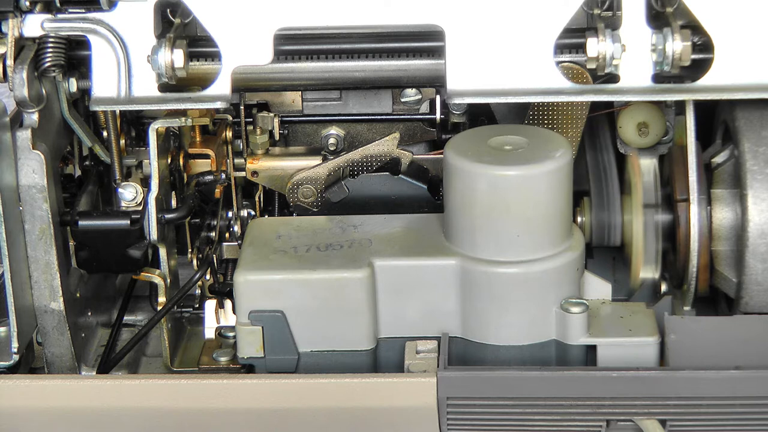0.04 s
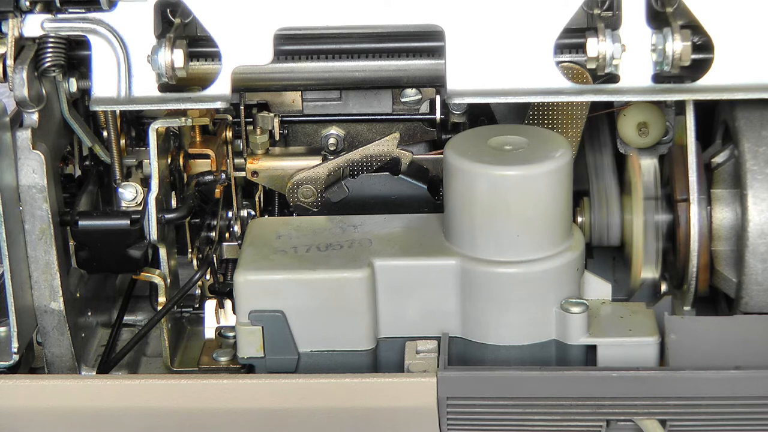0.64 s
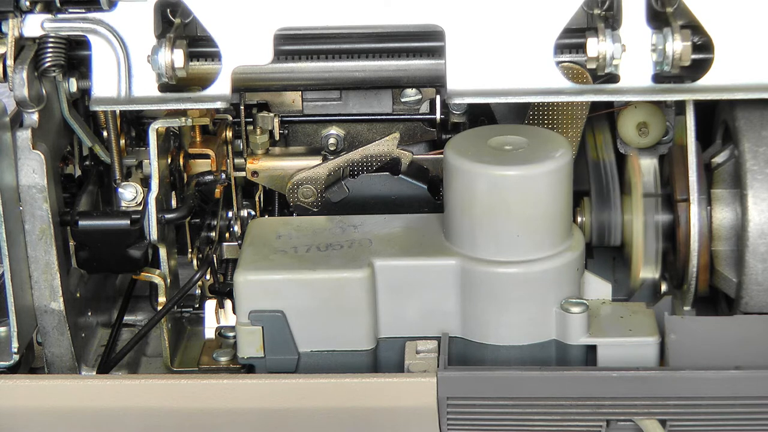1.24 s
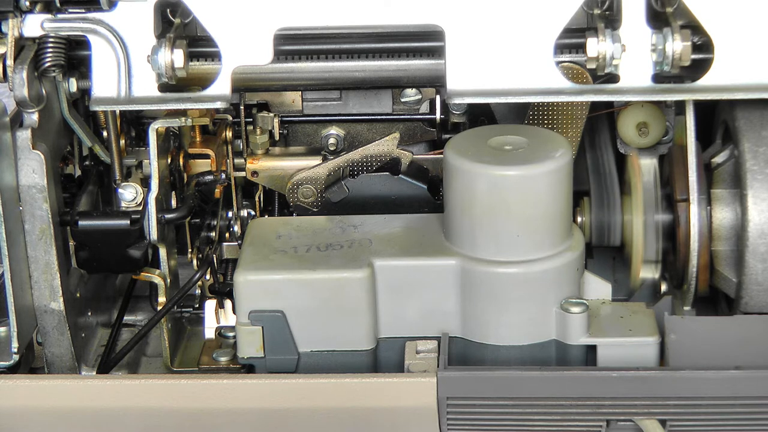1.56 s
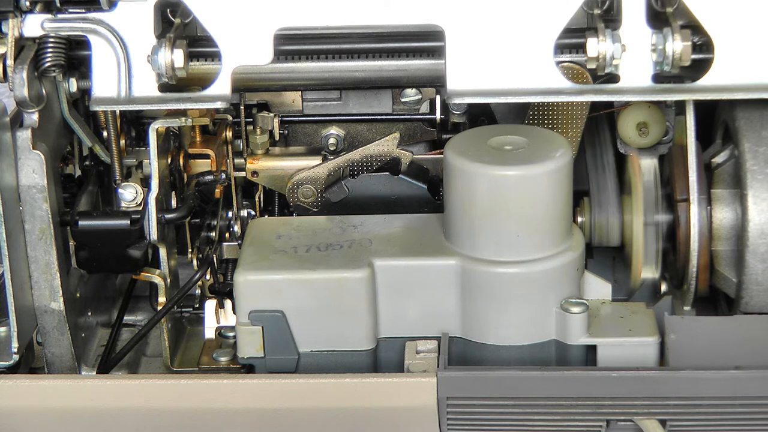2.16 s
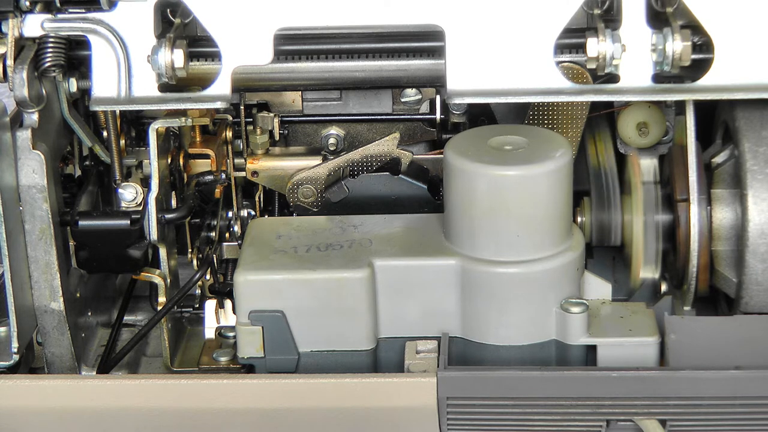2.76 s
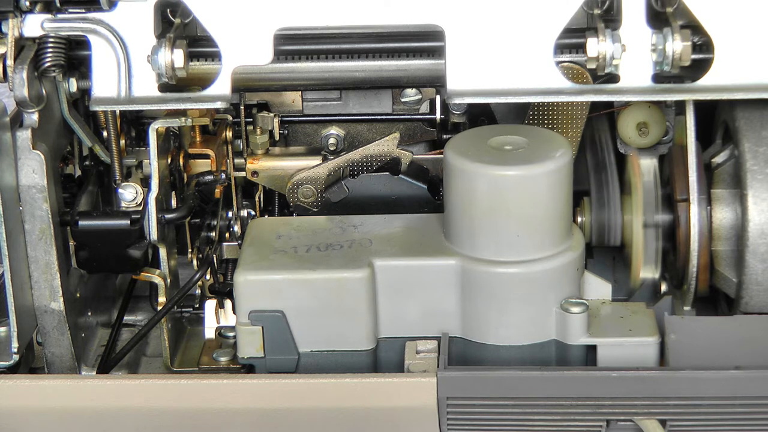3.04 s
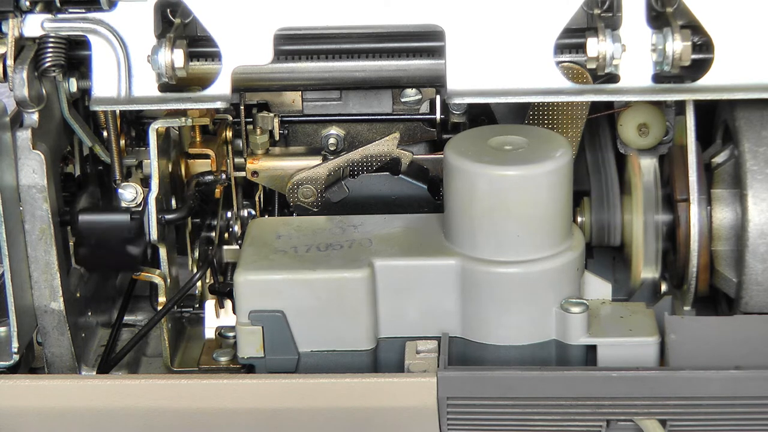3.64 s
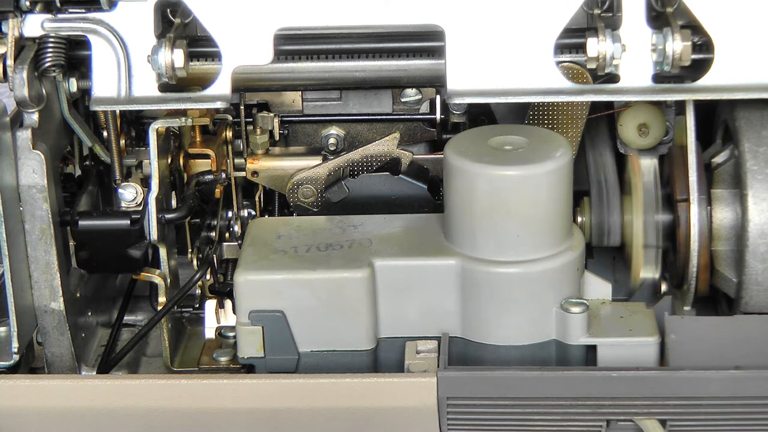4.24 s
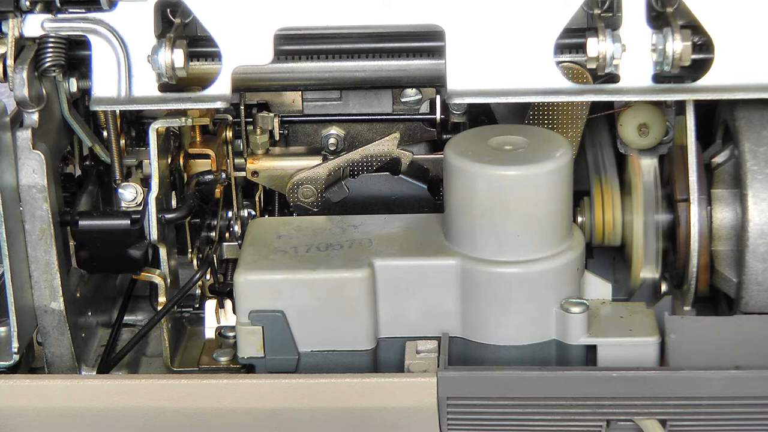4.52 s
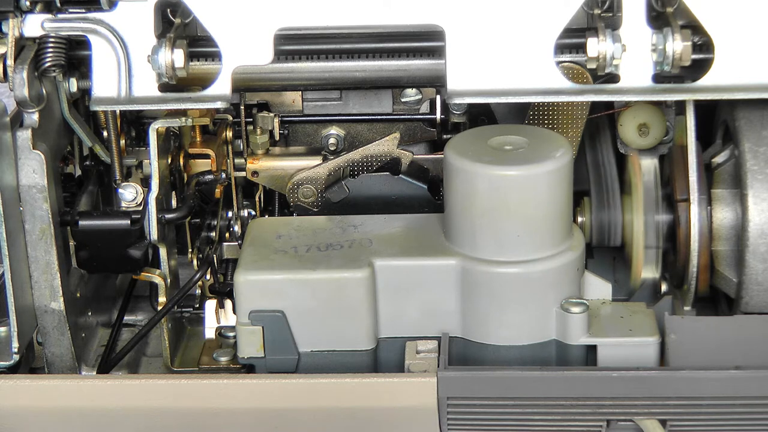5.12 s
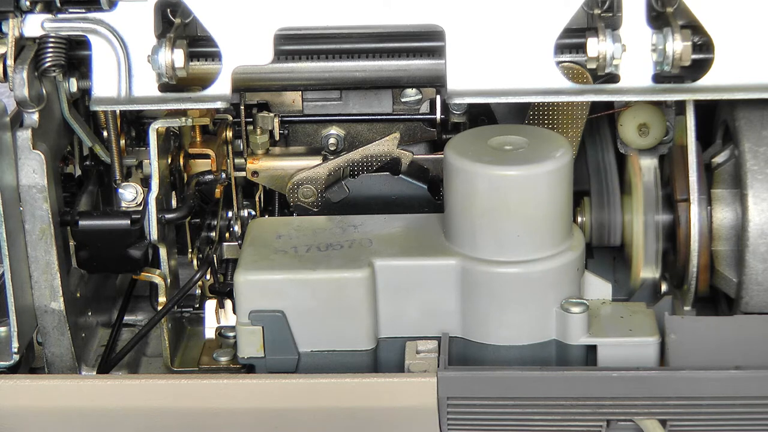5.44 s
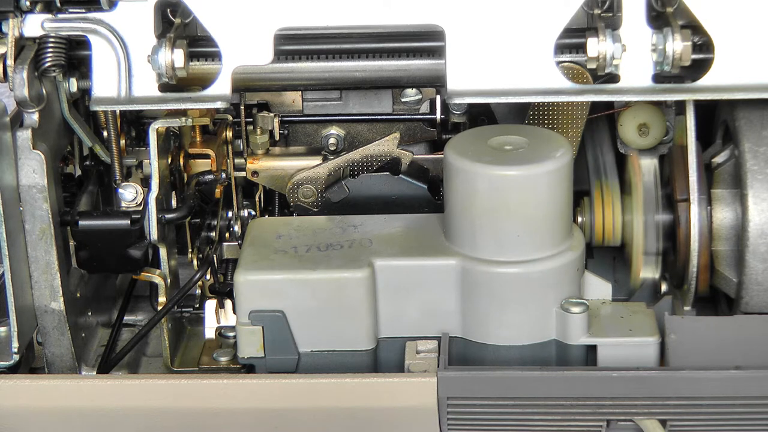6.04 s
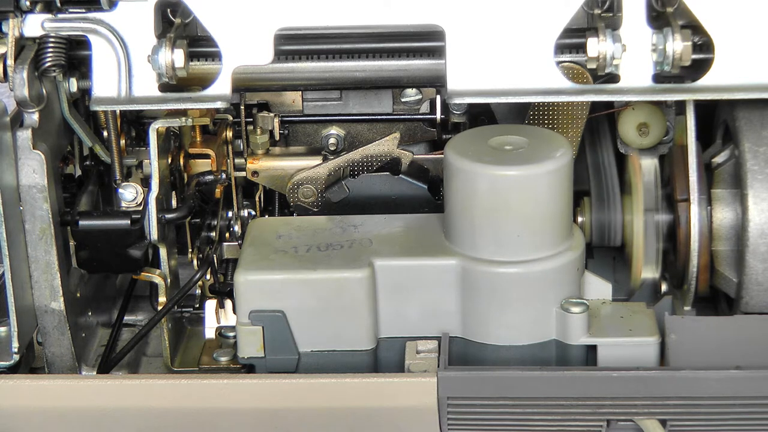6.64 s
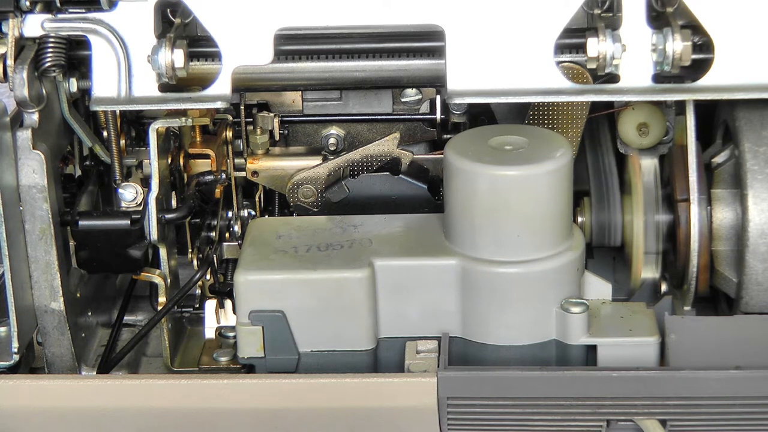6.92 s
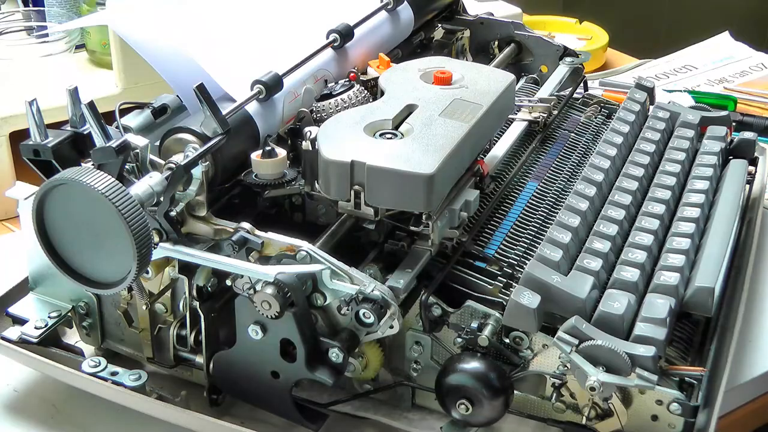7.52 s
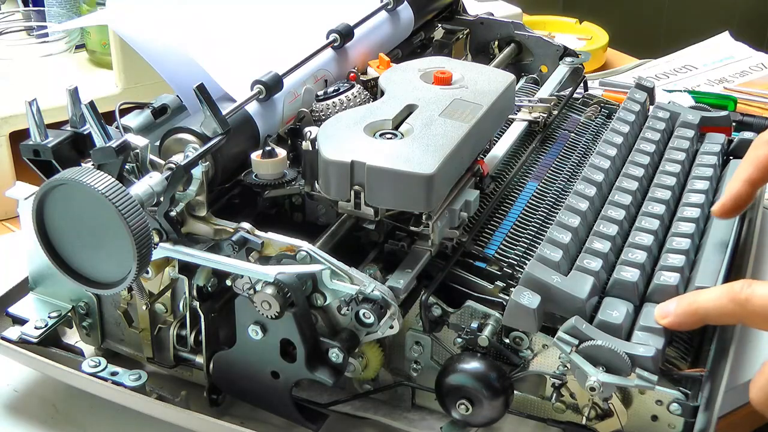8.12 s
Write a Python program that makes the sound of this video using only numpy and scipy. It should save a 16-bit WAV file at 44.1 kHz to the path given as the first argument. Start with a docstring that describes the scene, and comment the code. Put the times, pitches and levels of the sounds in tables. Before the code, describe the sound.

An uncovered electric typewriter hums and whirs, striking sharp steel clacks singly and in a quick burst, then a heavy clunk.

```python
"""An electric typewriter with its cover off, close up in a small room. The motor hums and its shaft ticks.
First five characters are printed, each a quick chain of steel hitting steel. Levers latch, and after
3 s a held key repeats five times. Past 6 s a heavy part clunks home. Then, with the microphone beside
the keyboard, a part slides with a soft rub, and at 8 s one more key is struck."""
import sys
import numpy as np
from scipy import signal
from scipy.fft import rfft, irfft, next_fast_len
from scipy.io import wavfile
from scipy.ndimage import map_coordinates

SR = 44100
rng = np.random.default_rng(int(sys.argv[2]) if len(sys.argv) > 2 else 0)


def store_wav(level_fs):
    """Save 16-bit WAV to argv[1]."""
    pcm = np.round(np.clip(np.atleast_2d(level_fs), -1, 1) * 32767)
    wavfile.write(sys.argv[1], SR, pcm.T.astype(np.int16))


N = 365148

# how a part bounces: (first hop/s, each hop's length over the last, loss per bounce/dB)
CAM_BOUNCE, LEVER_BOUNCE, CLUNK_BOUNCE = (.0052, .9, 4.9), (.005, .99, 6.5), (.0065, 1.2, 2.7)

PRINT_TIMES = [(.0872, 6), (.342, 6.5), (.5975, 5.5), (.891, 6), (1.416, 7)]  # printed characters: (t/s, level/dB)
# the hits within one stroke: (t/s, level/dB, thud/dB, brightness/dB per octave)
PRINT_HITS = [(-.0105, -32, -12, 0.5), (0, -12, -16, 0.5), (0.011, -17, 6, 2.5), (0.021, -11, -2.5, -0.5),
              (0.0367, -14, -0.5, 0.5), (.051, -8.5, 2, -1.5), (.072, -10, 1, 3.5)]
PRINT_STEEL = [(300, -32), (900, -20.5), (1400, -13), (1800, -4.5), (2300, 1), (3000, -1.5), (3700, -1),
               (5000, -1), (6500, -1.5), (8000, -6), (10000, -10), (12500, -14.5), (15500, -13)]  # tone colour of a hit: (f/Hz, level/dB)
PRINT_SPRINGS = [(1712, 5, .7), (2729, 2, .6), (6218, 1, 1.9), (6290, 0, 1.1), (6347, -1, 1.6),
                 (9558, 0, .15)]  # ringing springs and links: (f/Hz, level/dB, ring time/s)
def printing():
    """The clutch turns the cams once per character, setting off a chain of hits."""
    return strokes(PRINT_TIMES, PRINT_HITS, PRINT_STEEL, PRINT_SPRINGS, CAM_BOUNCE, count=3, room_db=-6.5)


REPEAT_TIMES = [(3.171, 2), (3.295, 4.5), (3.4175, 6), (3.538, 8), (3.659, 7.5)]  # strokes of the held key: (t/s, level/dB)
REPEAT_HITS = [(-.012, -22.5, 2, -0.079), (0, -10.5, -2.5, 0.42), (.0135, -13.5, 1, 0),
               (0.0287, -8, -6, -0.13), (.055, -22, -0.5, -1.3)]  # one stroke: (t/s, level/dB, thud/dB, brightness/dB per octave)
REPEAT_STEEL = [(300, -20.5), (900, -10.5), (1600, -12.5), (2200, -4), (3000, 0.5), (3700, -1),
                (4600, -0.5), (5500, 1.5), (7000, 2.5), (8800, -4.5), (11500, -11.5), (14000, -9.5),
                (15500, -8.5)]  # tone colour of a hit: (f/Hz, level/dB)
REPEAT_SPRINGS = [(6720, 1, 0.11), (13400, -2, .05)]  # ringing springs: (f/Hz, level/dB, ring time/s)
def held_key():
    """A held key repeats its stroke about eight times a second."""
    return strokes(REPEAT_TIMES, REPEAT_HITS, REPEAT_STEEL, REPEAT_SPRINGS, CAM_BOUNCE,
                   count=3, room_db=-4.5)


CLUNK_TIMES = [(6.4495, 2.5)]  # the landing: (t/s, level/dB)
CLUNK_HITS = [(0, -12, -17, 0.0049), (.0075, -8, 7.5, 0)]  # a touch, then the hit: (t/s, level/dB, thud/dB, brightness/dB per octave)
CLUNK_STEEL = [(300, -40), (900, -17), (1400, -12.5), (1900, 1), (2400, -0.5), (2850, 0.5), (4200, -5),
               (4700, 1.5), (5700, -2), (7300, -3), (8200, -10), (10500, -17), (13000, -13), (15500, -20)]  # tone colour of a hit: (f/Hz, level/dB)
def clunk():
    """A heavy part drops onto its stop and bounces, shaking the lever springs."""
    return strokes(CLUNK_TIMES, CLUNK_HITS, CLUNK_STEEL, LEVER_SPRINGS, CLUNK_BOUNCE,
                   count=6, room_db=-5.5)


LEVER_HITS = [(1.81, -19, -13, -2), (1.8229, -5, -7, 1.5), (1.873, -8, -6, -1.5), (1.883, -6.5, 7.5, -0.5),
              (1.967, -11.5, -16, 1.5), (3.0747, -13.5, -11, -0.5), (3.086, -6, -6.5, 0),
              (3.149, -21.5, -6, 0), (3.398, -6.5, 5, 2), (6.29, -27, -10, 0), (6.3118, -7.5, -2.5, -0.5),
              (7.99, -16, -4.5, -3.5), (8, -6.5, -3, 0.5), (8.04, -9, -7, -1)]  # lever clicks: (t/s, level/dB, thud/dB, brightness/dB per octave)
LEVER_STEEL = [(300, -38.5), (900, -9), (1400, -10.5), (2000, -1), (2900, 2.5), (3800, 1), (5000, 3),
               (7200, 0), (8500, -2.5), (12000, -8.5), (15500, -4)]  # tone colour of a hit: (f/Hz, level/dB)
LEVER_SPRINGS = [(2013, 1, .4), (5534, -6, .22), (8344, -9, .12)]  # ringing springs: (f/Hz, level/dB, ring time/s)
def levers():
    """Levers latch or drop back with a short chatter that rings the frame."""
    track = np.zeros((2, N))
    for s, db, thud_db, tilt in LEVER_HITS:
        chatter = bouncing(LEVER_STEEL, thud_db, tilt, LEVER_BOUNCE, count=3)
        add(track, s, ringing(amp(db) * chatter, LEVER_SPRINGS, room_db=-5.5))
    return track


def strokes(times, cycle, steel, springs, bounce, count, room_db):
    """Every stroke plays the same chain of bouncing hits, with slightly loose timing."""
    track = np.zeros((2, N))
    lead_s = .02  # space for hits that come early
    for s, stroke_db in times:
        hits = np.zeros((2, SR // 4))
        for (after, db, thud_db, tilt), late in zip(cycle, rng.uniform(-1, 1, len(cycle))):
            hit = amp(stroke_db + db) * bouncing(steel, thud_db, tilt, bounce, count)
            add(hits, lead_s + after * (1 + .012 * late), hit)
        add(track, s - lead_s, ringing(hits, springs, room_db))
    return track


def bouncing(steel, thud_db, tilt, bounce, count):
    """A part lands count times, losing strength, a little uneven in time and force."""
    hop_s, ratio, loss_db = bounce
    hits, s = np.zeros((2, SR // 5)), 0
    for k, (late, force) in enumerate(rng.uniform(-1, 1, (count, 2))):
        add(hits, s, amp(3.26 * force - loss_db * k) * contact(steel, thud_db, tilt))
        s += hop_s * ratio ** k * (1 + .12 * late)
    return hits


PLATE_KNOCK = [(200, -12.5), (400, -6), (520, -3.5), (750, 0), (920, -4), (1100, -3), (1600, -4),
               (3000, -16.5)]  # tone colour of the side plates: (f/Hz, level/dB)
BODY_THUMP = [(25, -28), (48, -11), (70, 6.5), (110, 4.5), (190, -2), (270, 3), (380, -12.5), (800, -32)]  # tone colour of the body on the desk: (f/Hz, level/dB)
def contact(steel, thud_db, tilt):
    """Steel hits steel: a crack and a rattle; the plates knock, and the heavy body follows more slowly."""
    t = np.arange(SR // 10) / SR
    crack = amp(-4.5 - 60 * t / .0076) * stereo_noise(len(t), side_db=-10.5)
    rattle = amp(-5 - 60 * t / .078) * stereo_noise(len(t), side_db=-18.5)
    knock = amp(thud_db - 16.5 - 60 * t / .026) * stereo_noise(len(t), side_db=-22)
    swell = 1 - np.exp(-t / .0064)
    thump = amp(thud_db - 22.5 - 60 * t / .08) * swell * stereo_noise(len(t), side_db=-23)
    clack = coloured(crack + rattle, steel, tilt)
    return clack + coloured(knock, PLATE_KNOCK) + coloured(thump, BODY_THUMP)


ROOM_FADE = [(100, 0.43), (400, 0.26), (1000, 0.29), (3000, 0.32), (6000, 0.29), (10000, 0.24),
             (15000, 0.2)]  # how long frame and room take to fade by 60 dB: (f/Hz, ring time/s)
FRAME_NOTES = [(206, 1.5, 0.087), (580, -7.5, 0.038), (707, -6, 0.11), (1396, -25, 0.15), (1860, -8, 0.35),
               (2000, -0.5, 0.28), (2360, -5, 0.2), (2720, -2, 0.065), (2952, -11, 0.16), (3345, 0, 0.21),
               (3650, -21, 0.35), (4450, -14, 0.28), (4600, -13, 0.15), (5700, -16, 0.11),
               (5850, -5, 0.072), (6800, -3, 0.041), (7300, 3, 0.058)]  # the frame's own notes: (f/Hz, level/dB, ring time/s)
def ringing(hits, springs, room_db):
    """Hits make the frame and springs ring, and leave a soft wash of echo."""
    hz, s, spectrum = signal.stft(stereo_noise(SR // 2, side_db=-13), SR, nperseg=256)
    fade = amp(-60 * s / along(ROOM_FADE, hz)[:, None])
    echo = signal.istft(spectrum * fade, SR, nperseg=256)[1]
    t = np.arange(SR) / SR
    response = np.zeros((2, SR))
    for f, db, ring_s in FRAME_NOTES + springs:
        uptake = 2 * np.log(1000) / (ring_s * SR)  # a long note takes up the hit slowly, so starts weaker
        response += uptake * amp(db + rng.standard_normal() - 60 * t / ring_s) * np.cos(2 * np.pi * f * t)
    response[:, :echo.shape[1]] += amp(room_db) * echo / np.linalg.norm(echo[0])
    response[:, 0] += 1  # the hit itself
    return signal.fftconvolve(hits, response, axes=1)


RUB_COLOUR = [(530, -42), (900, -16), (1420, -5.5), (1660, -10), (1930, -2.5), (2990, -2), (5450, -7),
              (5850, -7.5), (11600, -27), (15000, -31)]  # tone colour of the rubbing: (f/Hz, level/dB)
def slide(start_s=7.225, rise_s=.07, hold_s=.19, stop_s=.13):
    """A part speeds up, slides along with a fine, uneven rub, and slows to rest."""
    corners = np.cumsum([start_s, rise_s, hold_s, stop_s])
    speed = np.interp(np.arange(N) / SR, corners, [0, 1, 1, 0])
    return speed * amp(-37.5 + .93 * wobble(120)) * coloured(stereo_noise(N, side_db=-11.5), RUB_COLOUR)


SHAFT_HZ, MAINS_HZ = 24.43, 50
HARD_TICKS = [(1.289, 5), (4.009, 7.5), (4.131, 7), (4.991, 4), (5.114, 3.5), (5.441, 6)]  # turns that catch harder: (t/s, extra level/dB)
TICK_COLOUR = [(1000, -26), (2200, 3), (2850, 3), (3400, 5), (4500, -3), (5400, -1), (7500, -13.5),
               (9000, -15), (15500, -22)]  # tone colour of a tick: (f/Hz, level/dB)
def shaft_ticks(t, turns):
    """A high spot on the shaft catches once a turn, never quite alike: a snap and a short chatter."""
    since_s = (turns % 1) / SHAFT_HZ
    scatter_db = .2 * rng.standard_normal(256)[np.floor(turns).astype(int)]
    harder_db = sum(db * (np.abs(t - s) < .5 / SHAFT_HZ) for s, db in HARD_TICKS)
    catch_db = np.where(harder_db > 0, harder_db, scatter_db)
    fade = amp(3 - 60 * since_s / .016) + amp(-9 - 60 * since_s / .08)
    return amp(2.5 + catch_db) * fade * coloured(stereo_noise(N, side_db=-21), TICK_COLOUR)


MOTOR_SWELL = [(0, -46.5, -1.5), (2.8, -49, -1), (4.6, -45.5, 1), (6.1, -45.5, 1), (6.9, -49, 0)]  # slow swells: (t/s, hum level/dB, shaft tone level/dB)
BELT_SLIP = [(3.07, .33), (3.75, 0)]  # the shaft falls behind as the held key loads the belt: (t/s, lead/turns)
SHAFT_TONES = [(3, -63.5), (8, -63), (9, -67), (10, -50.5), (11, -70.5), (14, -70), (22, -68), (24, -60),
               (25, -65.5), (28, -67.5), (30, -61.5), (32, -66), (34, -68), (40, -68.5), (68, -69),
               (70, -61), (80, -65.5)]  # tones of the spinning shaft: (cycles per turn, level/dB)
CASE_RUMBLE = [(25, -14), (50, -7), (75, 7), (130, -3), (210, -0.5), (290, -6.5), (400, -9), (590, -3),
               (680, -10), (780, -1), (950, -18), (1300, -24)]  # tone colour of the case: (f/Hz, level/dB)
FRONT_WHIR = [(590, -35), (1000, -6), (1290, -10), (1450, -3), (1580, -8.5), (2000, -2.5), (2450, 1),
              (2820, 4.5), (3300, -1.5), (5200, -4), (5800, -9), (7700, -11), (8400, -22), (15500, -31.5)]  # belt and bearings from the front: (f/Hz, level/dB)
SIDE_WHIR = [(30, -2), (75, 16.5), (140, 2), (430, 4), (510, 0), (760, 5), (1000, -1.5), (1300, -2),
             (2300, 2), (5900, -0.5), (7800, -8), (8600, -11), (15500, -18)]  # the whir from beside the keyboard: (f/Hz, level/dB)
def motor(throb_hz=3.1, tick_at_s=4.009, move_at_s=7.215):
    """The motor hums, whirs and turns the shaft, heard from the front and then from the side."""
    t = np.arange(N) / SR
    hum_db, tones_db = curves(MOTOR_SWELL)
    throb_db = 1.3 * np.sin(2 * np.pi * throb_hz * t) + .99 * wobble(16)
    hum = np.sqrt(2) * amp(throb_db) * np.sin(2 * np.pi * 2 * MAINS_HZ * t)
    turns = (t - tick_at_s) * SHAFT_HZ + curves(BELT_SLIP)[0] + .0013 * wobble(4)
    tones = np.zeros(N)
    for k, db in SHAFT_TONES:
        level = np.sqrt(2) * amp(db + wobble(6))
        tones += level * np.sin(2 * np.pi * (k * turns + rng.random()) + .2 * wobble(14))
    rumble = amp(-50.5) * coloured(stereo_noise(N, side_db=-14), CASE_RUMBLE)
    buzz = unit(amp(-4 * (2 * MAINS_HZ * t % 1)))  # the rotor shakes its bearings twice a mains cycle
    whir = shaft_ticks(t, turns) + buzz * coloured(stereo_noise(N, side_db=-18), FRONT_WHIR)
    front = amp(hum_db) * hum + amp(-47.5 + .42 * wobble(11)) * whir + amp(tones_db) * tones + rumble
    smooth_whir = coloured(stereo_noise(N, side_db=-15.5), SIDE_WHIR)
    beside = amp(-41.5) * hum + amp(-48.5) * smooth_whir + amp(-7.5) * tones
    moved = np.clip((t - move_at_s) / .027, 0, 1)
    return (1 - moved) * front + moved * beside


def amp(db):
    """Decibels to gain."""
    return 10 ** (np.asarray(db) / 20)


def unit(x):
    """Scale to an average power of 1."""
    return x / np.sqrt(np.mean(x ** 2) + 1e-20)


def along(points, hz):
    """Read (f/Hz, value) points on a pitch scale."""
    f, v = np.transpose(points)
    return np.interp(np.log(hz + 1), np.log(f), v)


def curves(rows):
    """One value per sample for each column after the time."""
    s, *columns = np.transpose(rows)
    return [np.interp(np.arange(N) / SR, s, column) for column in columns]


def wobble(rate):
    """A smooth curve through rate random points a second."""
    return map_coordinates(rng.standard_normal(int(N * rate / SR) + 4), [np.arange(N) * rate / SR])


def coloured(x, spectrum, tilt=0):
    """Give x a tone colour, tilted above 1 kHz by tilt dB per octave."""
    size = next_fast_len(x.shape[-1] // 2 + 1024) * 2
    hz = np.fft.rfftfreq(size, 1 / SR)
    gain = unit(amp(along(spectrum, hz) + tilt * np.log2(np.maximum(hz, 1000))))
    # make the filter ring only after a hit, never before it
    cepstrum = irfft(np.log(gain + 1e-6))
    cepstrum[1:size // 2] *= 2
    cepstrum[size // 2 + 1:] = 0
    return irfft(rfft(x, size) * np.exp(rfft(cepstrum)))[..., :x.shape[-1]]


def stereo_noise(size, side_db):
    """White noise in two channels that differ by a weaker side part."""
    mid, side = rng.standard_normal((2, size))
    return np.array([mid + amp(side_db) * side, mid - amp(side_db) * side])


def add(track, s, sound):
    """Mix a sound into the track at time s."""
    start = max(round(s * SR), 0)
    stretch = track[:, start:start + sound.shape[1]]
    stretch += sound[:, :stretch.shape[1]]


def scene():
    """The strokes sit slightly to the right, over the running motor."""
    clatter = printing() + held_key() + clunk() + levers()
    return clatter * amp([[-1.5], [-.5]]) + motor() + slide()


def gain_control(x, ceiling_db=-13, listen_s=.0034, recover_db_per_s=7.5):
    """Loud strokes turn the volume down at once; then it creeps back up."""
    keep = np.exp(-1 / (listen_s * SR))
    power = signal.lfilter([1 - keep], [1, -keep], np.mean(x ** 2, axis=0))
    over_db = np.maximum(10 * np.log10(power + 1e-12) - ceiling_db, 0)
    recovered_db = recover_db_per_s * np.arange(N) / SR
    return x * amp(recovered_db - np.maximum.accumulate(over_db + recovered_db))


STEREO_WIDTH = [(30, 15), (100, 3), (250, 8), (600, 4), (1200, 4), (4500, -3.5), (8000, -0.5), (12000, -14)]  # boost of the left-right difference: (f/Hz, level/dB)
def record(dry, top_hz=15760):
    """Loud peaks are held down and rounded; lows spread wide, highs narrow, and the very top is cut."""
    held = gain_control(dry)
    rounded = held / (1 + np.abs(held / .9) ** 4) ** (1 / 4)
    size = next_fast_len(N + SR // 2)
    hz = np.fft.rfftfreq(size, 1 / SR)
    left, right = rfft(rounded, size) * amp(-.15 * np.maximum(hz - top_hz, 0))
    mid = (left + right) / 2
    side = (left - right) / 2 * amp(along(STEREO_WIDTH, hz))
    return irfft([mid + side, mid - side], size)[:, :N]


dry = scene()
out = record(dry)
store_wav(out)
```